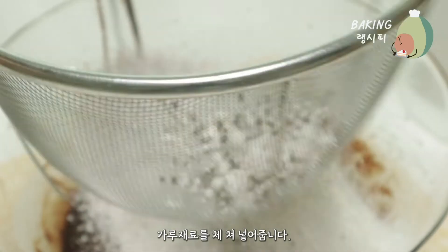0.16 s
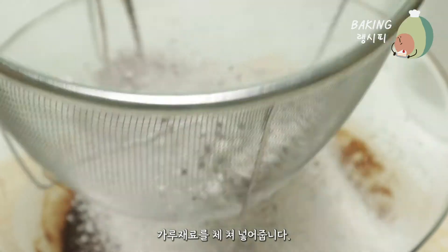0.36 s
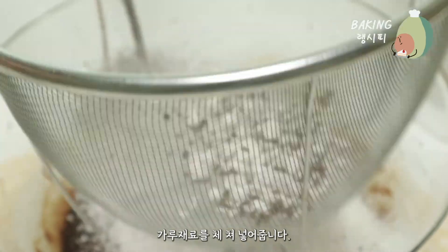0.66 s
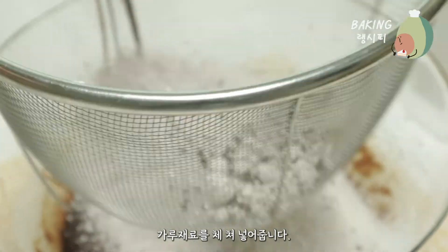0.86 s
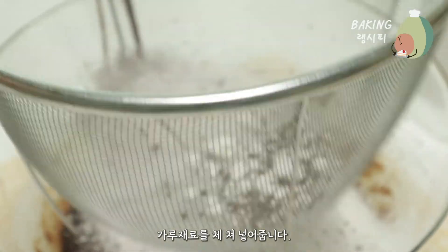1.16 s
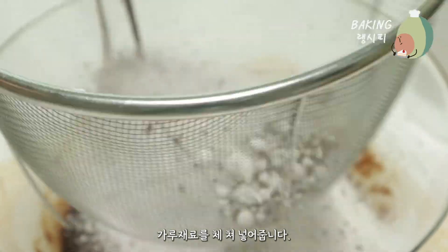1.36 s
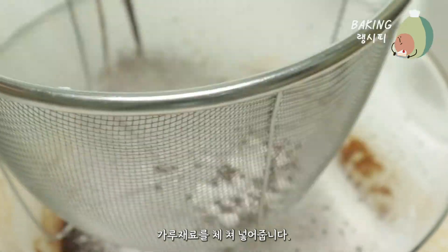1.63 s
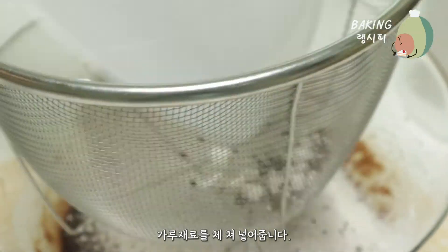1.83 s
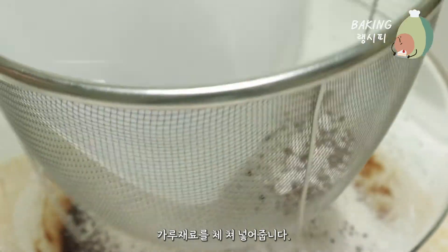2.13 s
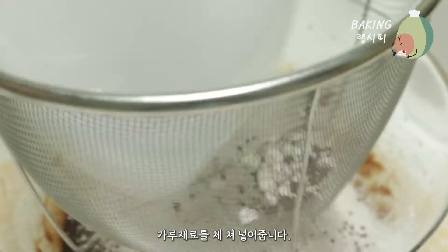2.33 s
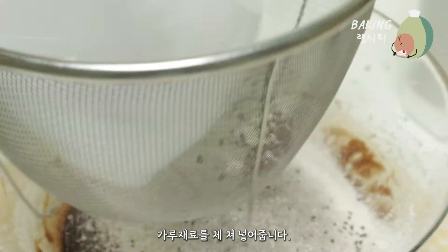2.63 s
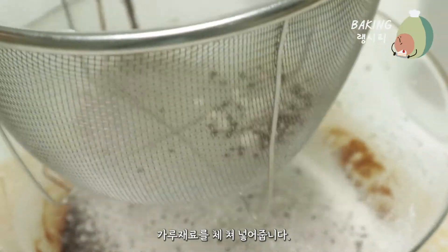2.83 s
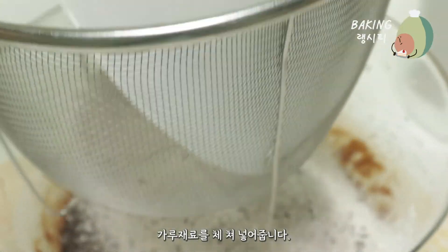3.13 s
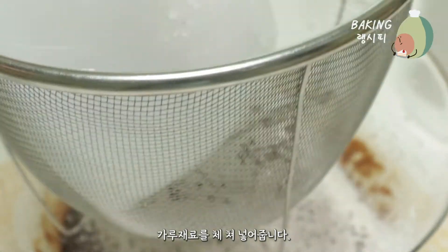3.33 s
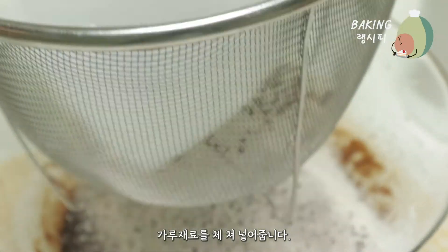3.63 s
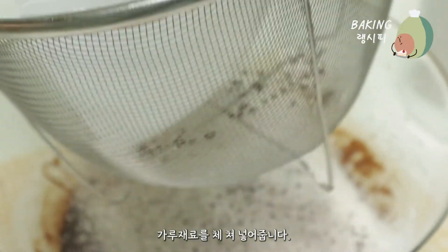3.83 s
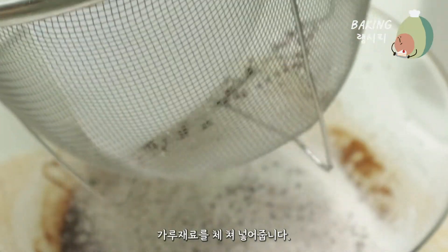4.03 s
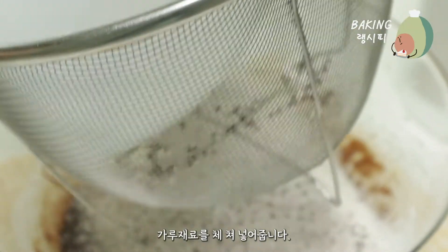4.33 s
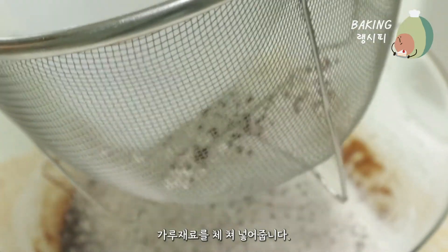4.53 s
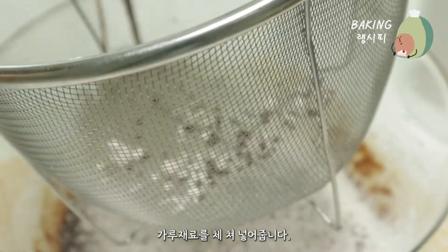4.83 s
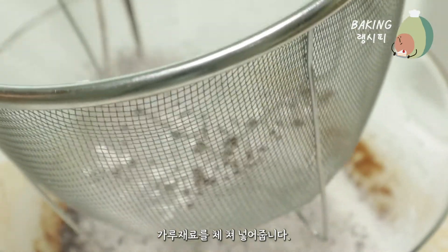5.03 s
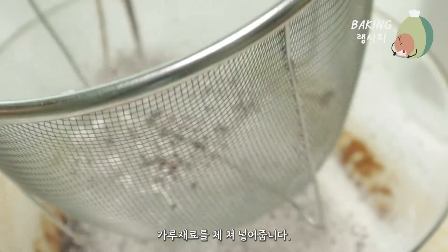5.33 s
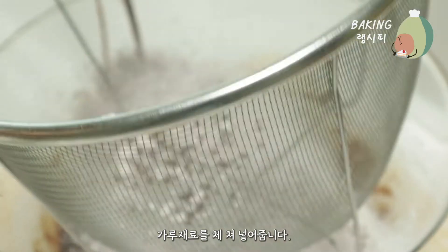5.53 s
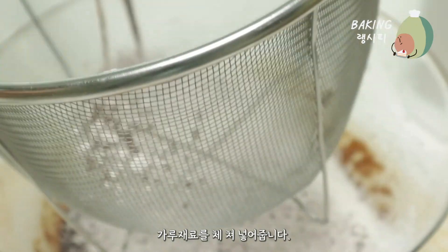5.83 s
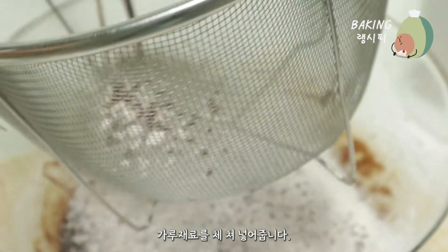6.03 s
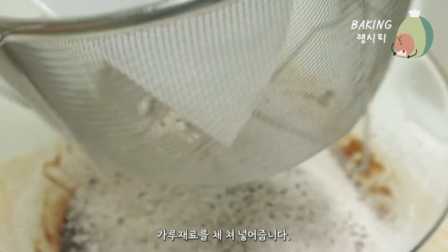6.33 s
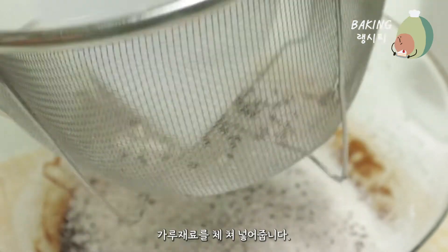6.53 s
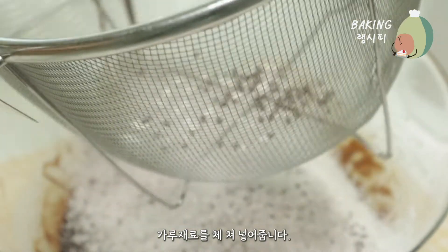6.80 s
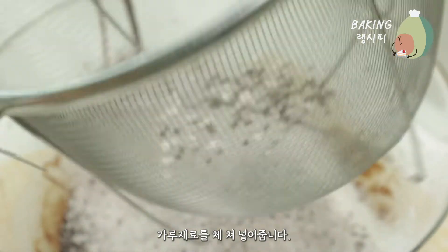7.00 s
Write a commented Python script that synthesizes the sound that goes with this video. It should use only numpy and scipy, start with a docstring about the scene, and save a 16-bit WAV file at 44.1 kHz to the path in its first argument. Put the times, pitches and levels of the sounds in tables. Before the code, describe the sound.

A small kitchen, heard close, the sieve a little left of centre. A low electric hum near 120 hertz and a dull rumble run throughout. Around 0.6 s the metal rim clinks, thin and bright, ringing for a fraction of a second. After a faint powder hiss near 1.2 s, five firm taps come at about 1.8, 2.0, 2.2, 2.4 and 2.6 s, each a wiry rattling burst with a quick rebound, the later ones duller and thumpier. From 3.05 to 4.15 s the mesh ticks and scrapes, strongest near 3.3 and 3.7 s, then very faint. Two looser, rattly taps follow at 4.4 and 4.6 s. Barely audible powder slides near 4.9 and 5.2 s. Three last taps land at 6.2, 6.4 and 6.55 s. The bowl rings along briefly. The hum's eight-per-second throb deepens from 2 to 4.7 s, dips near 2.8 and 6.3 s, and fades at the end.

```python
"""Sieving flour and cocoa

A small kitchen, close to a steel mesh sieve tapped and shaken over a bowl, a little left of two microphones.
Each tap is a burst of wire-on-wire contacts that rings the basket and rim, then a rebound.
Between the runs of taps the mesh ticks and scrapes and powder slides; once the rim clinks.
The bowl rings along and the room answers. Underneath, a motor beats against the mains hum over a dull rumble."""
import sys
import numpy as np
from scipy import signal
from scipy.fft import rfft, irfft
from scipy.io import wavfile
from scipy.ndimage import uniform_filter1d, minimum_filter1d, map_coordinates

SR = 44100
rng = np.random.default_rng(int(sys.argv[2]) if len(sys.argv) > 2 else 0)


def bounce(signal):
    """Save signal as a 16-bit WAV file at the path given by the first command-line argument."""
    frames = np.transpose(np.atleast_2d(signal))
    limited = np.clip(frames, -1, 1)
    pcm = np.round(limited * 32767).astype(np.int16)
    wavfile.write(sys.argv[1], SR, pcm)


N = 315756
TIME = np.arange(N) / SR
HIT_SIZE = SR // 3   # samples given to one contact sound
OPPOSED = np.array([[1], [-1]])   # signs of a side signal at the left and right microphone


def from_db(db):
    """Amplitude factor of a level in dB."""
    return 10 ** (np.asarray(db) / 20)


def rms_one(x):
    """Scale to an rms of 1."""
    return x / np.sqrt(np.mean(x ** 2) + 1e-20)


def add(out, s, sound):
    """Mix a stereo sound in at time s."""
    at = int(s * SR)
    out[:, at:at + sound.shape[1]] += sound[:, :N - at]


def band(x, low_hz, high_hz, order=2):
    """Keep the frequencies from low_hz to high_hz."""
    return signal.sosfilt(signal.butter(order, [low_hz, high_hz], "band", fs=SR, output="sos"), x)


def high_pass(x, hz):
    """Take away the weight below hz."""
    return signal.sosfilt(signal.butter(4, hz, "high", fs=SR, output="sos"), x)


def resonate(x, hz, width_hz):
    """One damped resonance, with a gain of 1 on top."""
    r = np.exp(-np.pi * width_hz / SR)
    feedforward = np.array([1, 0, -1]) * (1 - r * r) / 2
    feedback = [1, -2 * r * np.cos(2 * np.pi * hz / SR), r * r]
    return signal.lfilter(feedforward, feedback, x + 1e-18)


def pan(left_db):
    """Gains of the two microphones, left over right by left_db."""
    return from_db(left_db * OPPOSED / 2)


# Common level of the hum's mains and motor tones. Each row: time in seconds, gain in dB.
HUM_GAIN = [(0, 0), (1.7, .5), (2.8, -7), (3.8, 0), (6.05, 0), (6.3, -4), (6.65, 0), (7.15, -15)]
# Faint steady tones of the motor. Each row: frequency in Hz, peak level in dB.
FAINT_MOTOR_TONES = [(25.6, -81), (74.7, -72), (205, -77)]
MAINS_HZ, MOTOR_HZ = 120.08, 111.985
# peak levels before the common gain; the motor swells once from quiet to loud
MAINS_DB, MOTOR_QUIET_DB, MOTOR_LOUD_DB = -41, -51, -37.5
SWELL_START_S, SWELL_END_S = 1.9, 4.7


def hum():
    """Two close tones beat eight times a second, more deeply once the motor has swelled."""
    gain_db = np.interp(TIME, *np.transpose(HUM_GAIN))
    motor_db = np.interp(TIME, [SWELL_START_S, SWELL_END_S], [MOTOR_QUIET_DB, MOTOR_LOUD_DB])
    beating = [(MAINS_HZ, MAINS_DB + gain_db), (MOTOR_HZ, motor_db + gain_db)]
    return sum(from_db(db) * np.cos(2 * np.pi * hz * TIME) for hz, db in beating + FAINT_MOTOR_TONES)


# Spectrum of the room rumble. Each row: frequency in Hz, relative density in dB.
RUMBLE_SPECTRUM = [(20, -8.5), (38, -3), (55, -13), (85, 1.5), (110, 15), (140, 2.5), (175, -12),
                   (250, -17.5), (450, -28.5), (1000, -36), (4000, -46), (14000, -57)]
RUMBLE_DB = -59   # rms


def rumble(side_db=-13):
    """Dull steady room noise, nearly the same at both microphones."""
    points_hz, points_db = np.transpose(RUMBLE_SPECTRUM)
    hz = np.maximum(np.fft.rfftfreq(N, 1 / SR), 1)
    shape = from_db(np.interp(np.log(hz), np.log(points_hz), points_db))
    mid, side = irfft(rfft(rng.standard_normal((2, N))) * shape, N)
    return from_db(RUMBLE_DB) * rms_one(mid + from_db(side_db) * side * OPPOSED)


def contacts(per_s, spread_db):
    """Random wire-on-wire clicks of uneven size and either sign; rms 1."""
    sizes = from_db(spread_db * np.minimum(rng.exponential(1, HIT_SIZE), 4))
    signs = rng.choice([-1, 1], HIT_SIZE)
    touching = rng.random(HIT_SIZE) < per_s / SR
    return rms_one(sizes * signs * touching)


def stroke(length_s, edge_s=0.0072, slips_per_s=8000, catch_per_s=110, catch_db=1.74):
    """A dense stream of slips starts, holds for length_s and dies; it catches and lets go unevenly."""
    t = TIME[:HIT_SIZE]
    catches_db = catch_db * np.interp(t * catch_per_s, np.arange(64), rng.standard_normal(64))
    start = 1 - np.exp(-t / edge_s)
    end = np.exp(-np.maximum(t - length_s, 0) / edge_s)
    return start * end * from_db(catches_db) * contacts(slips_per_s, spread_db=4.0)


# Powder sliding over the mesh. Each row: start in seconds, length in seconds, level in dB before the band filter.
POWDER_SLIDES = [(0.312, 0.096, -74.5), (1.163, .042, -63), (4.88, .04, -76.5), (5.18, 0.0402, -63)]
SLIDE_LOW_HZ, SLIDE_HIGH_HZ = 6540, 11000


def slides():
    """Sliding powder makes a faint high hiss: two independent streams of slips, one per microphone."""
    out = np.zeros((2, N))
    for s, length_s, db in POWDER_SLIDES:
        slips = np.array([stroke(length_s), stroke(length_s)])
        add(out, s, from_db(db) * band(slips, SLIDE_LOW_HZ, SLIDE_HIGH_HZ))
    return out


# Resonances of the bowl. Each row: frequency in Hz, width in Hz, gain in dB.
BOWL_MODES = [(594, 59, -4), (684, 13, -3), (964, 31, -0.5), (1071.7, 14, -1), (1200, 18, -2)]


def bowl(x):
    """The bowl under the sieve rings along in its narrow modes."""
    return sum(from_db(db) * resonate(x, hz, width_hz) for hz, width_hz, db in BOWL_MODES)


# Kitchen reverberation. Each row: frequency in Hz, time to fall 60 dB in seconds,
# level in dB against the direct sound.
KITCHEN_DECAY = [(300, 0.11, -10), (806.3, 0.16, -11.5), (1800, 0.1, -13.5), (3500, 0.092, -12),
                 (8000, .15, -16), (13000, 0.1, -15.5)]


def kitchen(x, build_s=0.018, alike_hz=1300):
    """Dense reflections from bowl and walls die band by band, alike at both microphones in the bass."""
    t, response = TIME[:SR // 2], 0
    points_hz, t60s, levels_db = np.transpose(KITCHEN_DECAY)
    edges_hz = np.geomspace(150, 15000, 11)
    for low_hz, high_hz in zip(edges_hz, edges_hz[1:]):
        hz = np.sqrt(low_hz * high_hz)
        t60 = np.interp(np.log(hz), np.log(points_hz), t60s)
        db = np.interp(np.log(hz), np.log(points_hz), levels_db)
        shape = from_db(-60 * t / t60) * (1 - np.exp(-(t / build_s) ** 2))
        mid, side = rng.standard_normal((2, len(t))) * shape / np.sqrt(2 * np.sum(shape ** 2))
        alike = 1 / (1 + (hz / alike_hz) ** 2)
        stereo = np.sqrt(1 + alike) * mid + np.sqrt(1 - alike) * side * OPPOSED
        response = response + from_db(db) * band(stereo, low_hz, high_hz)
    return signal.fftconvolve(x, response, axes=1)[:, :N]


# Resonances of the sieve, from the soft thump of the whole up to single wires.
# Each row: frequency in Hz, width in Hz, relative level in dB.
SIEVE_MODES = [(329, 100, -6.5), (438.7, 47, -3.5), (526, 56, -3.5), (635, 69, -5.5), (716.6, 93, -1),
               (810, 97, -10), (1069, 80, -3), (1050, 98, -5.5), (1285, 470, -10), (1709, 370, -6.5),
               (2230, 320, -5), (2620, 1300, -6), (3430, 220, -4.5), (3805, 410, -5.5), (3990, 600, -9),
               (5580, 650, -11.5), (7320, 370, -5), (8550, 2000, -3.5), (10070, 470, -6)]


def sieve(force, levels_db, span_s, detune=0.049, uneven_db=2.5, apart=0.82, apart_hz=3000):
    """A force rings the sieve; levels_db sets how strong each mode is over the first span_s."""
    mid, side = np.zeros((2, HIT_SIZE))
    for (hz, width_hz, db), touch_db in zip(SIEVE_MODES, levels_db):
        # grip and load shift the modes a little from blow to blow
        shift, strength, aim = rng.standard_normal(3)
        mode = resonate(force, hz * np.exp(detune * shift), width_hz)
        mode = band(mode, hz * 2 / 3, hz * 3 / 2)
        mode_rms = np.sqrt(np.mean(mode[:int(span_s * SR)] ** 2) + 1e-20)
        mode = from_db(touch_db + db + uneven_db * strength) * mode / mode_rms
        # short waves reach the two microphones in unlike phase
        turn = apart * aim * min(hz / apart_hz, 1)
        mid = mid + np.cos(turn) * mode
        side = side + np.sin(turn) * mode
    return mid + np.imag(signal.hilbert(side)) * OPPOSED


# Where the registers lie, in Hz: the basket below the first, the rim at the second, single wires at the third.
REGISTERS = [1200, 3500, 8500]
# Lowest and highest bending mode of the wire frame, in Hz.
FRAME_RANGE = [1500, 3000]
# the basket's modes fall off either side of the body pitch (dB per octave)
BELOW_BODY_DB, ABOVE_BODY_DB = 14, 2.5


def touch(db, body_hz, body_db, treble_db, firm_db=-23, frame_slope=0.44):
    """Level of each mode for one contact: the basket peaks at the body pitch, the wires follow treble_db."""
    hz = np.array(SIEVE_MODES)[:, 0]
    octaves = np.log2(hz / body_hz)
    basket_db = body_db + np.minimum(BELOW_BODY_DB * octaves, -ABOVE_BODY_DB * octaves)
    basket_share = np.interp(np.log(hz), np.log(REGISTERS), [0.96, 0.0042, 0.068])
    wire_share = np.interp(np.log(hz), np.log(REGISTERS), [0.023, 0.00022, 1])
    # the stiff frame answers mostly to firm blows
    in_frame = (FRAME_RANGE[0] < hz) & (hz < FRAME_RANGE[1])
    frame_db = in_frame * frame_slope * (db - firm_db)
    return db + basket_share * basket_db + wire_share * treble_db + frame_db


def blow(s, decay_s, levels_db, rattle_per_s=14000, buzz_db=-21, buzz_s=0.021, rise_share=.18):
    """Contacts swell to a burst, then the loose mesh buzzes on briefly; gives (start s, sound)."""
    lead_s = .004
    t = TIME[:HIT_SIZE] - lead_s
    after = np.maximum(t, 0)
    rise = (1 + np.tanh(t / (rise_share * decay_s))) / 2
    burst = np.exp(-after / decay_s)
    buzz = from_db(buzz_db) * np.exp(-after / buzz_s)
    force = rise * (burst + buzz) * contacts(rattle_per_s, spread_db=2.5)
    return s - lead_s, sieve(force, levels_db, span_s=.012)


CLINK_S = .609
# the blow that sets the rim ringing, level before the common sieve level
CLINK_HIT_DB, CLINK_DECAY_S, CLINK_LEFT_DB = -16, 0.0022, 1.5


def clink_hit(thin_hz=950):
    """The rim meets something hard: a thin, bright tick with little weight."""
    out = np.zeros((2, N))
    levels_db = touch(CLINK_HIT_DB, body_hz=1400, body_db=-12.5, treble_db=7, firm_db=-12.5)
    add(out, *blow(CLINK_S, CLINK_DECAY_S, levels_db, buzz_db=-27.5))
    return pan(CLINK_LEFT_DB) * high_pass(out, thin_hz)


# Free modes of the rim, in Hz.
RIM_MODES = [834, 1513, 2340, 2346, 3321, 3415, 4436, 5714, 7110, 8610]
# Their ring after the clink, in the same order.
# Each row: level in dB against the ring level, time to fall 60 dB in seconds.
RIM_RING = [(-6.5, .19), (-10.5, .17), (4.5, 0.24), (6, 0.22), (-2.5, .13), (-3.5, .13), (3.5, .15),
            (-2, .16), (1.5, .15), (-3, .15)]
RING_DB = -34.5


def clink():
    """Struck, the rim rings freely; its split pair of modes starts opposed, so that note swells."""
    out, t = np.zeros((2, N)), TIME[:SR // 2]
    ring = 0
    for k, (hz, (db, t60)) in enumerate(zip(RIM_MODES, RIM_RING)):
        decay = from_db(RING_DB + db - 60 * t / t60)
        ring = ring + (-1) ** k * decay * np.sin(2 * np.pi * hz * t)
    add(out, CLINK_S, np.array([ring, ring]))
    return out


# Firm taps; where one lands sets the pitch and weight of the basket's answer.
# Each row: time in seconds, rattle decay in seconds, level in dB before the common sieve level, body pitch in Hz,
# body in dB against the level, rebound delay in seconds, rebound in dB against the tap.
FIRM_TAPS = [(1.771, 0.0057, -17.5, 807, -6, 0.023, -4), (2.002, .0034, -17.5, 644, 1, 0.019, -12),
             (2.191, 0.00088, -19.5, 540, -4, .022, -7.5), (2.4084, 0.0015, -12.5, 331, -7.5, .02, -24.5),
             (2.6402, 0.002, -15, 431, -7.5, 0.019, -22), (4.409, 0.017, -22.5, 1155, -2, .019, -2.5),
             (4.624, 0.0076, -27, 800, -6.5, .015, 3), (6.172, 0.0017, -19, 881, 1.5, 0.019, -2.5),
             (6.374, 0.0076, -18.5, 800, -6.5, .027, -6), (6.5513, .0085, -25, 620, -6, 0.019, -2.5)]
REBOUND_DECAY_S, REBOUND_TREBLE_DB = 0.0021, -4


def taps(treble_db=-2.0):
    """The sieve is struck, springs back and lands again a moment later, more dully."""
    out = np.zeros((2, N))
    for s, decay_s, db, body_hz, body_db, rebound_s, rebound_db in FIRM_TAPS:
        tap_levels = touch(db, body_hz, body_db, treble_db)
        rebound_levels = touch(db + rebound_db, body_hz, body_db, REBOUND_TREBLE_DB)
        add(out, *blow(s, decay_s, tap_levels))
        add(out, *blow(s + rebound_s, REBOUND_DECAY_S, rebound_levels))
    return out


# Scrapes of the mesh. Each row: start in seconds, length in seconds, level in dB before the common sieve level,
# body pitch in Hz, body in dB against the level.
MESH_SCRAPES = [(1.78, 0.015, -23, 742, 0.5), (3.062, 0.03, -43.5, 1100, -29.5),
                (3.304, 0.036, -26, 800, 1), (3.323, 0.028, -27.5, 680, 1), (3.351, 0.051, -34, 830, -0.5),
                (3.657, .04, -42, 990, -5), (3.695, 0.054, -19.5, 840, -1.5), (3.784, .09, -56, 990, -4),
                (3.911, 0.055, -53.5, 1200, -13), (3.99, 0.058, -55.5, 1200, -13),
                (4.086, 0.045, -53, 1200, -13.5), (4.132, 0.025, -39.5, 1230, -5),
                (5.184, .03, -86, 1100, 14)]


def scrapes(treble_db=-2.5):
    """Wires slip over one another for as long as the stroke lasts."""
    out = np.zeros((2, N))
    for s, length_s, db, body_hz, body_db in MESH_SCRAPES:
        levels_db = touch(db, body_hz, body_db, treble_db)
        add(out, s, sieve(stroke(length_s), levels_db, length_s))
    return out


# Light ticks of the shaken mesh. Each row: time in seconds, rattle decay in seconds,
# level in dB before the common sieve level, body pitch in Hz, body in dB against the level.
MESH_TICKS = [(3.0523, 0.0023, -40.5, 1200, -40), (3.099, 0.0072, -43, 892, -2),
              (3.25, 0.0071, -45, 900, 4), (3.27, 0.016, -32, 950, 1.5), (3.295, .008, -24, 450, -10),
              (3.5722, 0.005, -36, 1200, -14), (3.624, 0.012, -41.5, 1140, -1),
              (4.011, 0.0037, -47.5, 1200, -24), (4.613, 0.01, -31, 794, -6),
              (6.581, 0.0035, -33, 900, 0.5)]


def ticks(treble_db=1.5):
    """Light single blows as the sieve is shaken, without a rebound."""
    out = np.zeros((2, N))
    for s, decay_s, db, body_hz, body_db in MESH_TICKS:
        add(out, *blow(s, decay_s, touch(db, body_hz, body_db, treble_db)))
    return out


LEFT_DB = 1.5   # left microphone over right


def scene(lag_samples=1.0, sieve_db=-2.0):
    """A little to the left, the sieve reaches the right microphone a moment late and a little weaker."""
    mesh = pan(LEFT_DB) * (taps() + ticks() + scrapes())
    left, right = from_db(sieve_db) * (mesh + clink_hit()) + slides()
    late_right = map_coordinates(right, [np.arange(N) - lag_samples], order=3)
    direct = np.array([left, late_right])
    ring = clink()
    return direct + ring + bowl(direct) + kitchen(direct + ring) + hum() + rumble()


CUTOFF_HZ = 16000


def record(dry):
    """The treble ends steeply; a fast limiter turns down peaks above full scale."""
    dull = signal.sosfilt(signal.cheby1(10, .3, 11900, fs=SR, output="sos"), dry)
    needed_gain = 1 / np.maximum(np.abs(dull), 1)
    gain = uniform_filter1d(minimum_filter1d(needed_gain, size=41), size=41)
    return signal.sosfilt(signal.butter(12, CUTOFF_HZ, fs=SR, output="sos"), gain * dull)


dry = scene()
out = record(dry)
bounce(out)
```